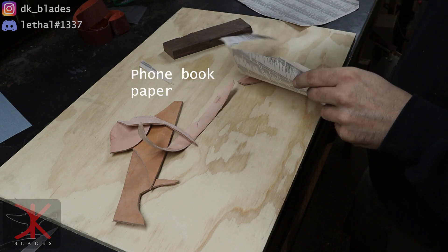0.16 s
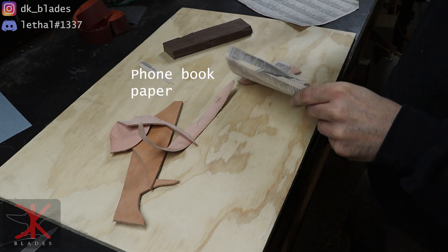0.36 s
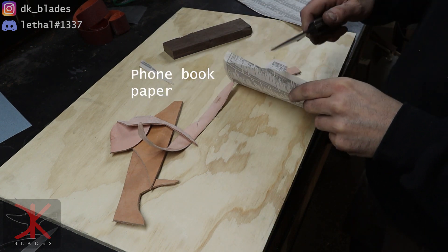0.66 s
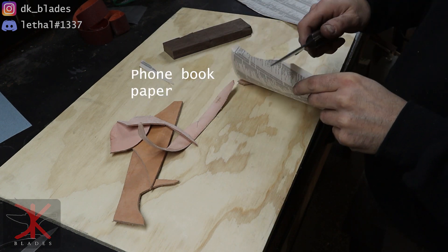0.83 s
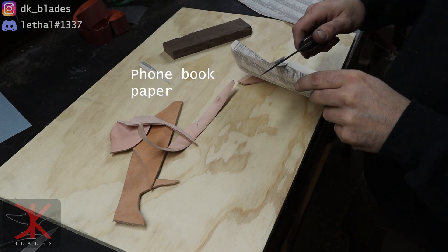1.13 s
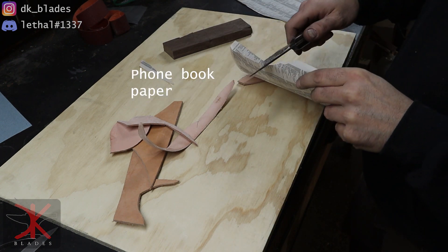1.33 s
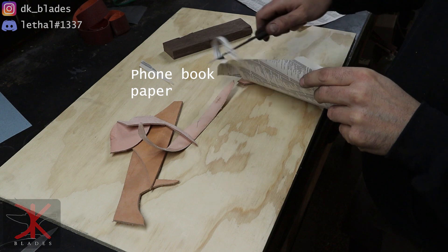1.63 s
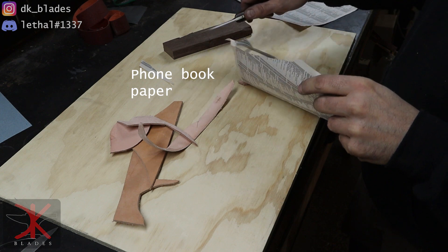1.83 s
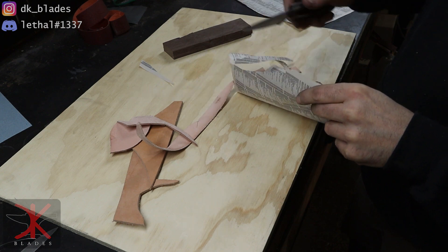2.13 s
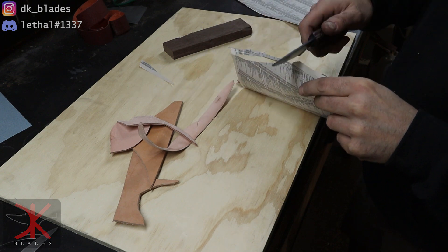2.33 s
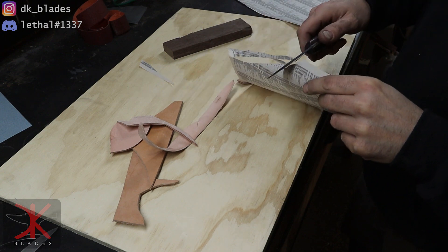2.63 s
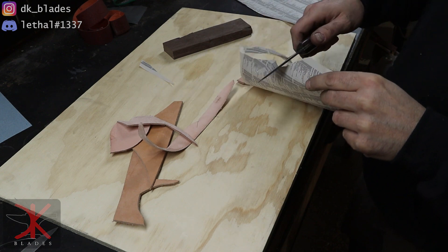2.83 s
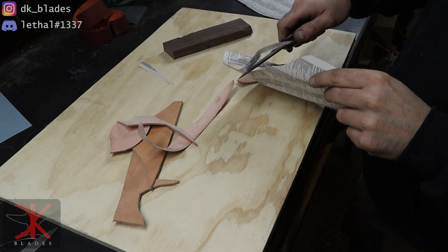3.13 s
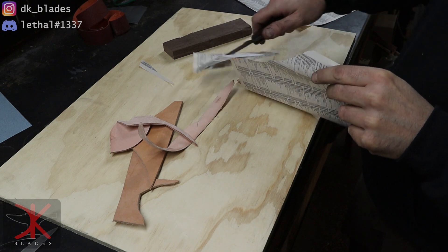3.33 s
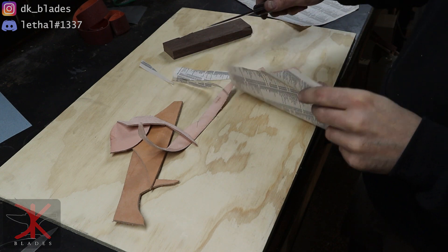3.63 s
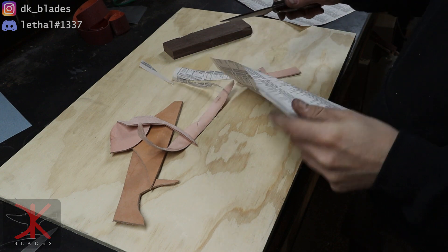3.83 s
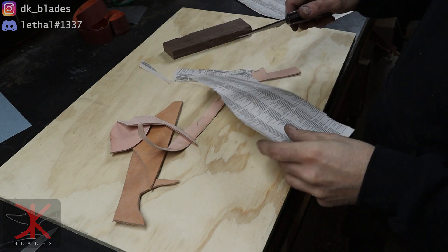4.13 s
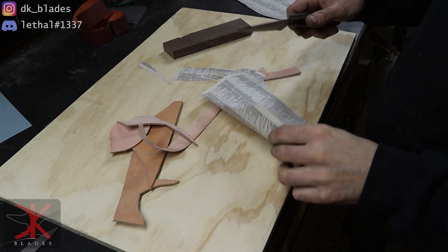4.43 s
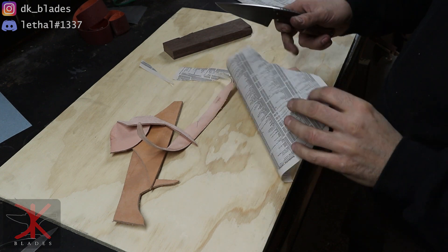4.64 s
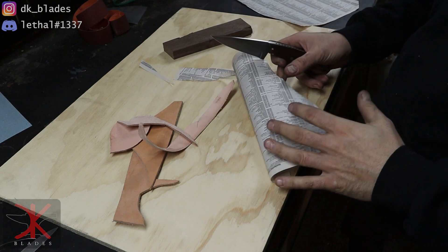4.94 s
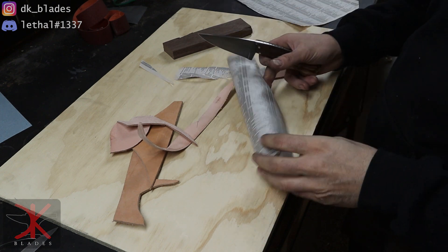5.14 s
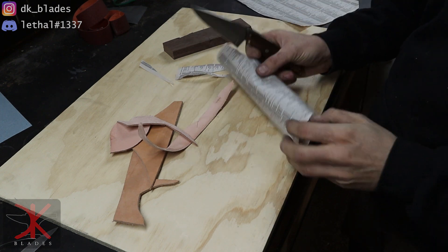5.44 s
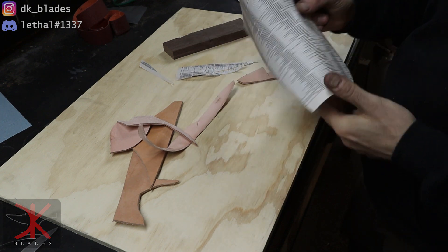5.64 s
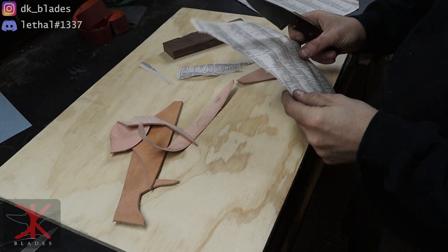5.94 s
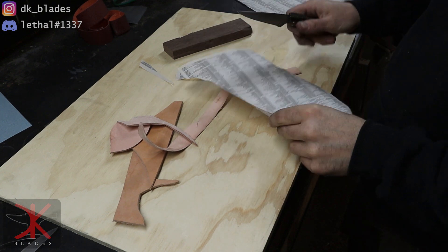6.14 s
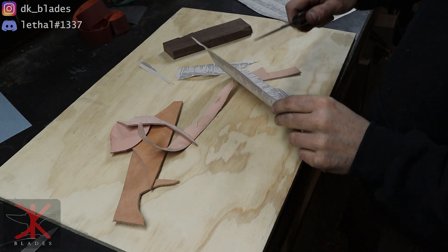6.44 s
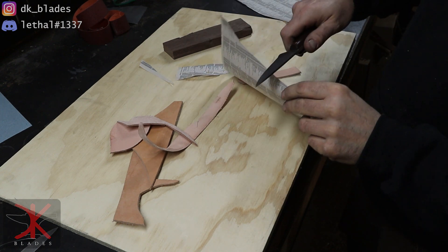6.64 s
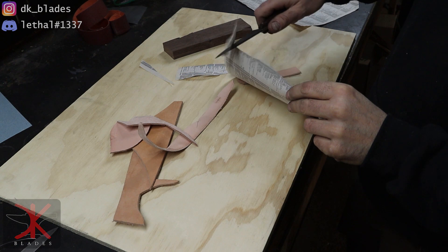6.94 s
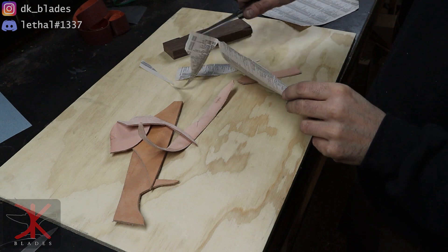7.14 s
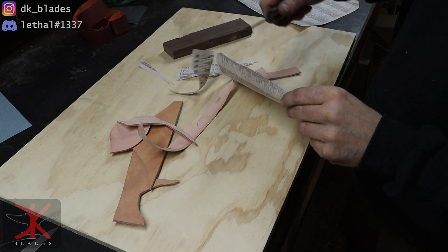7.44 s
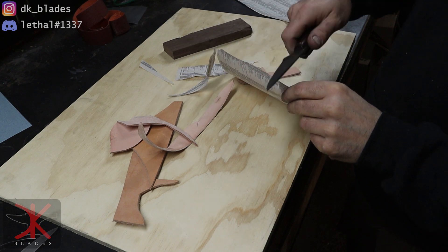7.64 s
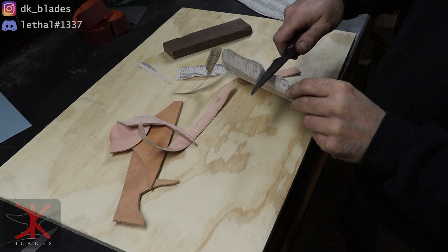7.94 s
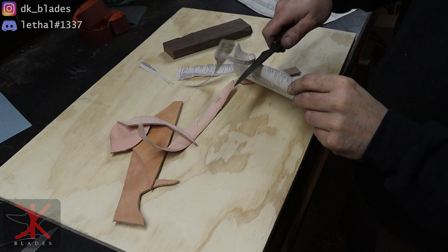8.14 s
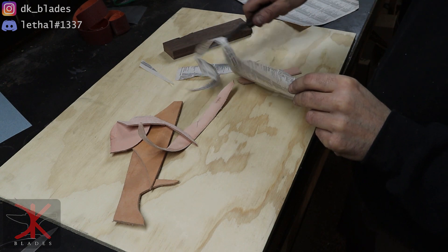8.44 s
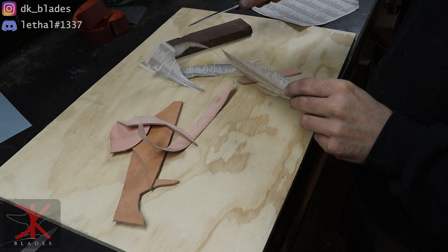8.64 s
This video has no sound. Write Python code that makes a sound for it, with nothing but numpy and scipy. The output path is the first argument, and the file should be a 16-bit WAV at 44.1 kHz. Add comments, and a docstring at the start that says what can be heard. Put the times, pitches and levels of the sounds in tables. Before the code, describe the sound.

A knife cuts thin printed paper close to the microphone in a small workshop. A short rip comes first, then two slower, gritty slices that build toward their ends. The sheet is then turned and crinkled with busy crackles and pops, followed by a fast, firm slice and a last, gentler one. Faint room tone and a distant low engine drone sit behind.

```python
"""Knife through thin paper

A sharp knife slices thin printed paper five times; in between, hands turn and crinkle the sheet.
Cutting and handling are random fibre snaps over hiss, split into bands and shaped by level curves.
A small workshop answers with decaying noise, the room hums softly as shaped noise, and an engine
drones far outside as wavering sines. One microphone, alike on both channels."""
import sys
import numpy as np
from scipy import signal
from scipy.fft import rfft, irfft, next_fast_len
from scipy.io import wavfile
from scipy.ndimage import uniform_filter1d, map_coordinates

SR = 44100
rng = np.random.default_rng(int(sys.argv[2]) if len(sys.argv) > 2 else 0)


def store_pcm(level_fs):
    """Save levels as 16-bit WAV."""
    pcm = np.round(np.clip(level_fs, -1, 1) * 32767).astype(np.int16)
    wavfile.write(sys.argv[1], SR, np.atleast_2d(pcm).T)


N = 387198

# All levels are set ahead of the microphone housing.
# room tone colour: [f/Hz, relative level/dB]
AIR_SPECTRUM = [(18, -48), (30, -2), (69, 0.5), (156, -6), (560, -15.5), (900, -14.5), (1780, -42),
                (3250, -26), (5600, -38), (11400, -37), (15700, -73)]
AIR_DB = -69.5  # mean level, about which the tone drifts
# far engine: [t/s, firing rate f/Hz, level/dB]
ENGINE_RUN = [(0, 58.5, -87), (.6, 56.7, -70), (1, 46, -82), (1.7, 45.5, -71), (2.6, 49, -63),
              (3.2, 48.83, -69), (4.8, 50.94, -64), (5.5, 50.3, -66.5), (6.2, 57, -101)]
# engine orders heard: [multiple of the firing rate, level/dB re engine]
ENGINE_ORDERS = [(1, -0.5), (2, -14), (2.5, -16), (3, -15.5)]
# workshop decay: [f/Hz, t60/s]
SHOP_DECAY = [(300, 0.45), (1500, 0.29), (5000, 0.13), (12000, 0.15)]

# hands on the sheet: [t/s, rustle level/dB, crispness level/dB re rustle]
HANDLING = [(0, -64.5, -11), (.7, -77.5, -1.5), (1, -75, -9), (1.8, -74, -1.5), (2.2, -72, -5),
            (2.3, -80.5, -5.5), (2.55, -74, -13), (3.5, -75.5, -6.5), (3.98, -65.5, -7), (4.06, -66, -8),
            (4.2, -62, -10), (4.3, -71, -5.5), (4.42, -67.5, -4.5), (4.56, -68.5, -8), (4.74, -61, -5.5),
            (5.0, -69.5, -11), (5.15, -77.5, -12), (5.2, -68.5, -6), (5.4, -58, -6.5), (5.6, -61, -1.5),
            (5.75, -67.5, -21), (5.9, -67, -3), (6.19, -69.5, -14.5), (6.5, -70.5, -6.5), (6.61, -83, -3),
            (6.7, -82, -4.5), (7.28, -78.5, -3.5), (7.39, -82.5, -2.5), (7.87, -86, -0.5),
            (8.62, -79.5, -7.5), (8.78, -77, 0)]
# creases pop or roll through the sheet: [t/s, level/dB, rise/s]
CREASE_EVENTS = [(.521, -56, 0.0044), (.56, -61, 0.051), (.72, -71, .01), (2.202, -62.5, 0.0017),
                 (2.333, -60, 0.0024), (3.614, -65.5, 0.00088), (3.826, -59.5, .002), (3.891, -60, .029),
                 (3.907, -64, .001), (4.085, -50, .005), (4.11, -53, 0.034), (4.318, -52, 0.011),
                 (4.347, -50, 0.00097), (4.384, -63, .001), (4.445, -59, 0.0061), (4.578, -50.5, 0.0013),
                 (4.635, -55, .002), (4.689, -64, 0.0086), (4.798, -46.5, 0.017), (4.945, -54, 0.0062),
                 (5.051, -60, .002), (5.228, -54.5, 0.04), (5.299, -45.5, 0.0032), (5.351, -52.5, 0.0022),
                 (5.406, -51, .003), (5.441, -49, .008), (5.475, -45, 0.0023), (5.547, -47, 0.00094),
                 (5.605, -54.5, 0.014), (5.709, -59, 0.0017), (5.778, -49.5, 0.0017), (5.806, -48, 0.005),
                 (5.838, -45.5, 0.0089), (5.901, -64, .001), (5.914, -55, 0.0011), (5.925, -47, 0.024),
                 (6.023, -53.5, 0.0034), (6.081, -51.5, .002), (6.265, -53, 0.068), (6.308, -57, .001),
                 (7.211, -54.5, 0.0024), (7.423, -69.5, 0.033), (7.565, -71, .001), (7.61, -72, 0.018),
                 (8.688, -66, .003)]
# colour of paper being handled: [f/Hz, relative level/dB]
RUSTLE_SPECTRUM = [(180, -19), (300, -15.5), (660, -9.5), (1200, -8), (2200, -1.5), (4200, -5.5),
                   (7300, -13.5), (12400, -20), (15700, -27.5)]
USUAL_RUSTLE_DB = -65  # louder handling than this loses flutter and crispness
FLUTTER_DB, FLUTTER_LAG = -2, 0.3  # flutter re rustle; dB lost per dB of louder rustle
CRISP_LAG = 0.2  # dB of crispness lost per dB of louder rustle
FLICKER_DB, FLICKER_PER_S = 2, 22  # the rustle comes and goes under the fingers: depth, knots a second
SNAP_DB, SNAP_RISE_S = 16, .001  # crease click re its level, up to this rise; slower creases click less
SETTLE_DB, SETTLE_T60_S = -10.5, 0.28  # the sheet shivers after a stroke: level re its end, decay
# a burst of rise FADE_RISE_S has t60 FADE_S; slower rises fade longer by the power FADE_GROWS
FADE_S, FADE_RISE_S, FADE_GROWS = 0.081, 0.0017, 0.37

# the freed strip flaps once: (t/s, f/Hz, level/dB, t60/s)
STRIP_FLAP = (.068, 355, -34, .07)

# knife strokes, one list each: [t/s, tearing level/dB, brightness/dB (tilt toward the treble)]
STROKES = [
    [(0, -41.5, -2), (0.048, -44, -5), (0.076, -34.5, -1), (0.128, -42.5, 4)],
    [(1.012, -59, -0.5), (1.074, -57, 2), (1.09, -48.5, 11.5), (1.131, -56.5, -2), (1.185, -56, 0.5),
     (1.299, -59.5, -0.5), (1.391, -58.5, -2), (1.425, -49, -5.5), (1.6, -48.5, -4.5), (1.74, -46.5, 5)],
    [(2.545, -60.5, -5), (2.588, -53, 2.5), (2.716, -50, 0.5), (2.78, -56.5, -4), (2.937, -45.5, -3),
     (2.975, -50, 1.5), (3.027, -38, -4.5), (3.093, -50, 1.5), (3.316, -41, -2.5), (3.4, -47.5, 2)],
    [(6.801, -47, 0.5), (6.85, -39.5, 0), (6.876, -47.5, -1), (6.98, -42, -2), (7.054, -43, -10),
     (7.078, -40, 1), (7.148, -40.5, 2), (7.187, -50, 3)],
    [(7.877, -58.5, 2), (7.914, -51, 2), (8.014, -56.5, 1), (8.056, -49.5, -0.5), (8.118, -48, -3),
     (8.245, -40.5, -1.5), (8.301, -45.5, 1.5), (8.393, -41, 1), (8.419, -50.5, -0.5), (8.552, -47.5, 4.5)],
]
# the blade bites or snags: [t/s, level/dB, rise/s]
BLADE_SNAGS = [(.076, -26.5, 0.0022), (1.029, -56, 0.0011), (1.08, -50.5, 0.0038), (1.122, -53.5, .001),
               (1.193, -51, 0.0011), (1.71, -47, 0.0073), (2.664, -50.5, .001), (2.823, -51.5, .001),
               (3.025, -43, 0.0016), (3.381, -39.5, .002), (7.073, -36, .0018), (7.992, -48.5, .002),
               (8.025, -45, .002), (8.057, -41.5, 0.0032), (8.160, -36.5, 0.0019)]
# colour of paper being cut: [f/Hz, relative level/dB]
SLICE_SPECTRUM = [(120, -51.5), (220, -28), (360, -13.5), (500, -16), (720, -9.5), (1500, -7), (2300, -3.5),
                  (6000, -13), (7400, -18), (13500, -20.5), (15700, -26.5)]
# how the sheet is held, one row a stroke: [flutter, body, edge hiss: level/dB re tearing]
HELD_COLOUR = [(-8, -5, -6), (-5, -2, -1.5), (-6, -3.5, -3.5), (-5, -4, -6), (-4.5, -4, -3.5)]
USUAL_CUT_DB = -50  # cutting level at which the lags below are nil
# loss per dB of harder cutting: [flutter, body, tearing, hiss: dB/dB]
CUT_LAG = [0.4, 0.49, 0, 0.19]
# gain per dB of brightness: [flutter, body, tearing, hiss: dB/dB]
BRIGHTNESS_TILT = [-0.38, -0.59, -0.083, .7]

# cavities around the microphone: [centre f/Hz, width/Hz, added resonance level/dB]
HOUSING_CAVITIES = [(902, 145, 1), (2320, 570, -13.5), (3560, 390, -3.5), (5450, 1040, -0.5)]
TOP_HZ = 15760  # nothing passes above this


def amp(db):
    """Gain of a level in dB."""
    return 10 ** (np.asarray(db) / 20)


def unit(x):
    """Each row at rms 1."""
    return x / np.sqrt(np.mean(x ** 2, axis=-1, keepdims=True) + 1e-20)


def along(points, hz):
    """Read (Hz, value) points along a log frequency axis."""
    f, v = np.transpose(points)
    return np.interp(np.log(hz + 1), np.log(f + 1), v)


def curves(rows):
    """One value per sample for each column after the time."""
    s, *cols = np.transpose(rows)
    return [np.interp(np.arange(N) / SR, s, c) for c in cols]


def wobble(rate):
    """A smooth random curve, rate knots a second."""
    knots = rng.standard_normal(int(N * rate / SR) + 4)
    return map_coordinates(knots, [np.arange(N) * rate / SR])


def filtered(x, response):
    """Shape x by a response of frequency."""
    m = next_fast_len(N + 8192)
    return irfft(rfft(x, m) * response(np.fft.rfftfreq(m, 1 / SR)), m)[..., :N]


def over(level, usual_db):
    """dB of a smoothed level over its usual value."""
    smooth = np.abs(uniform_filter1d(level, size=900))
    return 20 * np.log10(smooth + 1e-4) - usual_db


def spells(tables):
    """Gain of separate spells of sound with silence between them."""
    t = np.arange(N) / SR
    sounding = sum((t >= rows[0][0]) & (t < rows[-1][0]) for rows in tables) > 0
    soft_gate = uniform_filter1d(sounding * 1., size=200)
    return amp(curves(np.concatenate(tables))[0]) * soft_gate


def bursts(events):
    """Rises of level that die away; a quicker rise starts with a harder crack and fades sooner."""
    gain, t = np.zeros(N + SR), np.arange(SR // 3) / SR
    for s, db, rise in events:
        rise = max(rise, 3e-4)
        t60 = FADE_S * (rise / FADE_RISE_S) ** FADE_GROWS
        swell = np.sin(np.pi / 2 * np.clip(t / rise, 0, 1)) ** 2
        crack = 0.0019 / rise * np.exp(-t / 0.00095)
        fade = amp(db - 60 * np.maximum(t - rise, 0) / t60)
        gain[round(s * SR):][:len(t)] += fade * (swell + crack)
    return gain[:N]


def fibres(spectrum, edges_hz, per_s, spread_db, snap_gain, clump_db, patchy_db):
    """Fibres snapping at random over a fine hiss, split at the edges into bands of rms 1."""
    chance, size = rng.random((2, N))
    sign = rng.choice([-1, 1], N)
    fibre_snaps = (chance < per_s / SR) * amp(-spread_db * np.log(size + 0.034)) * sign
    grit = snap_gain * unit(fibre_snaps) + rng.standard_normal(N)
    # the paper gives way in jerks, so snaps come in clumps a few ms long
    grit = grit * amp(clump_db * (wobble(250) + 0.6 * wobble(45)))
    # the sheet bends and its colour drifts in patches
    z = signal.stft(grit, nperseg=256)[2]
    field = uniform_filter1d(rng.standard_normal(z.shape), size=4, axis=0)
    field = uniform_filter1d(field, size=30, axis=1)
    grit = signal.istft(z * amp(patchy_db * field / field.std()), nperseg=256)[1][:N]

    def band_shapes(hz):
        # each band is the difference of neighbouring low-passes
        lows = [1 / (1 + (hz / edge_hz) ** 8) for edge_hz in edges_hz]
        bands = np.diff([0 * hz] + lows + [1 + 0 * hz], axis=0)
        return amp(along(spectrum, hz)) * bands

    return unit(filtered(grit, band_shapes))


def room_tone():
    """Quiet shaped noise of the shop and the microphone, drifting slowly in level."""
    noise = filtered(rng.standard_normal(N), lambda hz: amp(along(AIR_SPECTRUM, hz)))
    return amp(AIR_DB + 1.4 * wobble(3)) * unit(noise)


def engine():
    """A few low orders of a distant engine, each wavering on its way through the walls."""
    hz, level_db = curves(ENGINE_RUN)
    turn = 2 * np.pi * np.cumsum(hz) / SR
    lines = 0
    for order, db in ENGINE_ORDERS:
        waver = amp(db + 3.8 * wobble(5))
        lines = lines + waver * np.sin(order * turn + 0.43 * wobble(4.0))
    return np.sqrt(2) * amp(level_db) * lines


def shop(x):
    """Each frequency of the room's answer, a tail of random noise, dies at its own speed."""
    step, wet = SR // 5, np.zeros(N + SR)
    for start in range(0, N, step):
        # a fresh random tail is drawn every fifth of a second
        hz, t, z = signal.stft(rng.standard_normal(SR // 2), SR, nperseg=256)
        decay = amp(-60 * t / along(SHOP_DECAY, hz)[:, None])
        tail = signal.istft(z * decay, SR, nperseg=256)[1]
        answer = signal.fftconvolve(x[start:start + step], tail / np.linalg.norm(tail))
        wet[start:start + len(answer)] += answer
    return wet[:N]


def settling():
    """Gain of the sheet shivering to rest after each stroke."""
    t = np.arange(N) / SR
    gain = 0
    for rows in STROKES:
        end_s, end_db = rows[-1][:2]
        fall_db = 60 * np.maximum(t - end_s, 0) / SETTLE_T60_S
        gain = gain + (t > end_s) * amp(end_db + SETTLE_DB - fall_db)
    return gain


def crease_clicks(events):
    """One dry click at the start of each crease, in the colour of the handled sheet."""
    s, db, rise = np.transpose(events)
    clicks = np.zeros(N)
    at = np.round(s * SR).astype(int) + 20
    clicks[at] = amp(db + SNAP_DB) * np.minimum(SNAP_RISE_S / rise, 1) ** 2
    return filtered(clicks, lambda hz: amp(along(RUSTLE_SPECTRUM, hz)))


def hands():
    """The sheet rustles as it is turned, and its creases give way."""
    rustle_db, crisp_db = curves(HANDLING)
    rustle = amp(rustle_db + FLICKER_DB * wobble(FLICKER_PER_S)) + settling()
    level = np.hypot(rustle, bursts(CREASE_EVENTS))
    louder_db = over(level, USUAL_RUSTLE_DB)
    flutter_db = FLUTTER_DB - FLUTTER_LAG * louder_db
    colour = amp([flutter_db, 0 * crisp_db, crisp_db - CRISP_LAG * louder_db])
    bands = fibres(RUSTLE_SPECTRUM, [1400, 4500], per_s=700, spread_db=3.5, snap_gain=0.71,
                   clump_db=1.0, patchy_db=2.7)
    return np.sum(level * colour * bands, axis=0) + crease_clicks(CREASE_EVENTS)


def flap():
    """The freed strip gives a soft low push of air: a decaying sine with a gentle onset."""
    s, hz, db, t60 = STRIP_FLAP
    t = np.maximum(np.arange(N) / SR - s, 0)
    onset = 1 - np.exp(-t / 0.0082)
    return amp(db - 60 * t / t60) * onset * np.sin(2 * np.pi * hz * t)


def knife():
    """The edge parts fibres steadily and sometimes snags; harder cutting lifts the tearing band most."""
    level = np.hypot(spells(STROKES), bursts(BLADE_SNAGS))
    bright_db = curves(np.concatenate(STROKES))[1]
    # the hold changes 0.1 s ahead of each new stroke
    starts = [rows[0][0] for rows in STROKES[1:]]
    stroke = np.searchsorted(starts, np.arange(N) / SR + .1)
    # tearing is the reference band, at 0 dB
    held_db = np.insert(np.array(HELD_COLOUR, float), 2, 0, axis=1)[stroke].T
    tilt_db = np.outer(BRIGHTNESS_TILT, bright_db)
    lag_db = np.outer(CUT_LAG, over(level, USUAL_CUT_DB))
    colour = amp(held_db + tilt_db - lag_db)
    bands = fibres(SLICE_SPECTRUM, [1400, 2900, 7300], per_s=1500, spread_db=3.0, snap_gain=0.94,
                   clump_db=1.27, patchy_db=2.13)
    return np.sum(level * colour * bands, axis=0)


def scene():
    """Paper close by, the room around it, the drone behind."""
    paper = knife() + flap() + hands()
    mix = paper + amp(-10.5) * shop(paper) + engine() + room_tone()
    return np.tile(mix, (2, 1))


def record(dry):
    """The microphone housing resonates in a few bands; nothing is kept above the band limit."""
    def response(f):
        lift = 1
        for centre, width, db in HOUSING_CAVITIES:
            damping = 1j * f * width
            lift = lift + amp(db) * damping / (centre * centre - f * f + damping)
        edge = np.clip((TOP_HZ - f) / 90, 0, 1) ** 2
        return amp(-4.5) * lift * edge

    return filtered(dry, response)


dry = scene()
out = record(dry)
store_pcm(out)
```